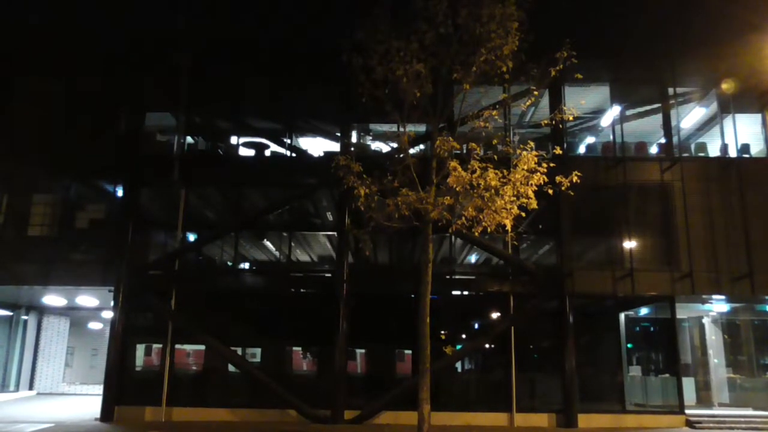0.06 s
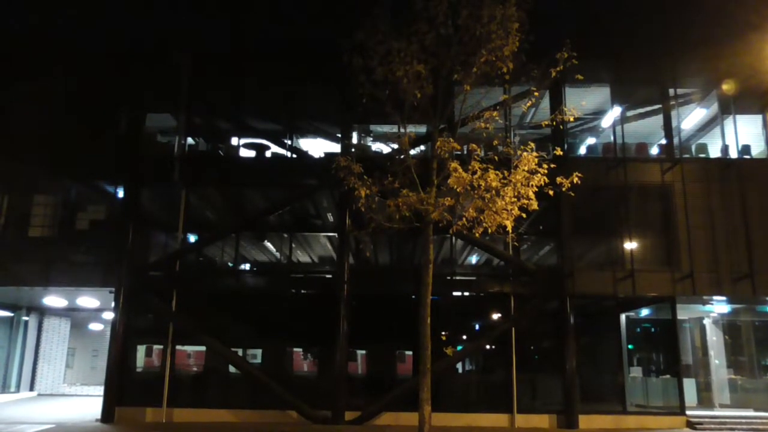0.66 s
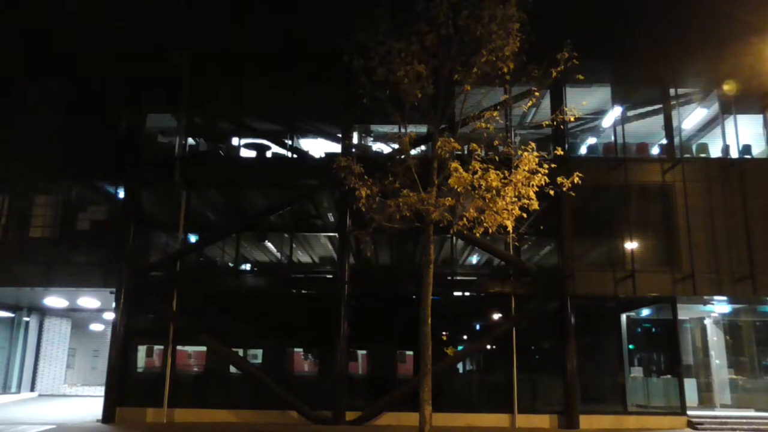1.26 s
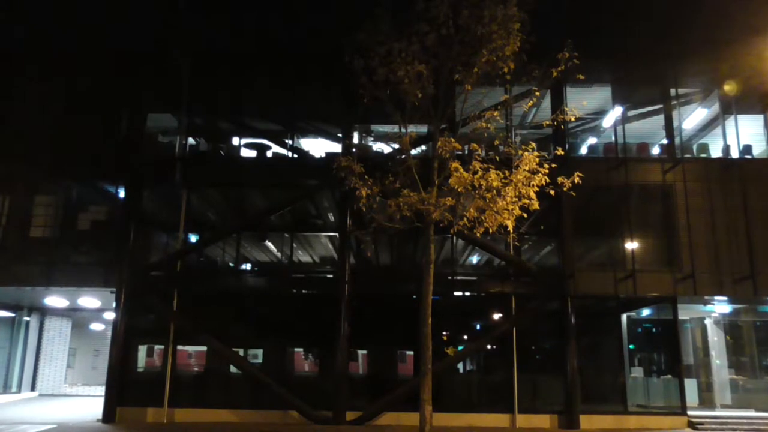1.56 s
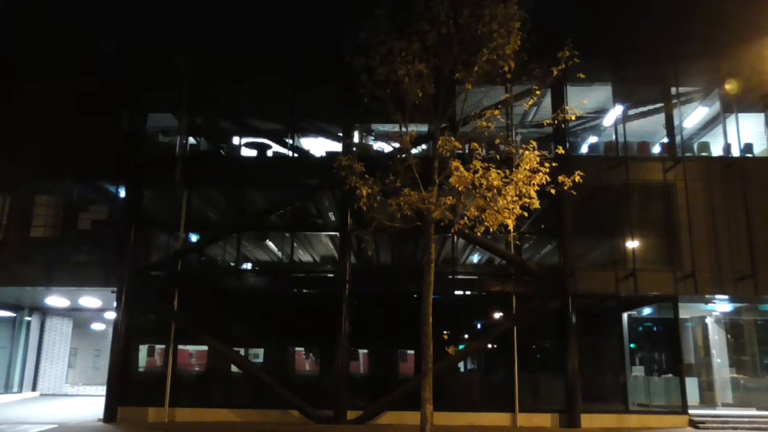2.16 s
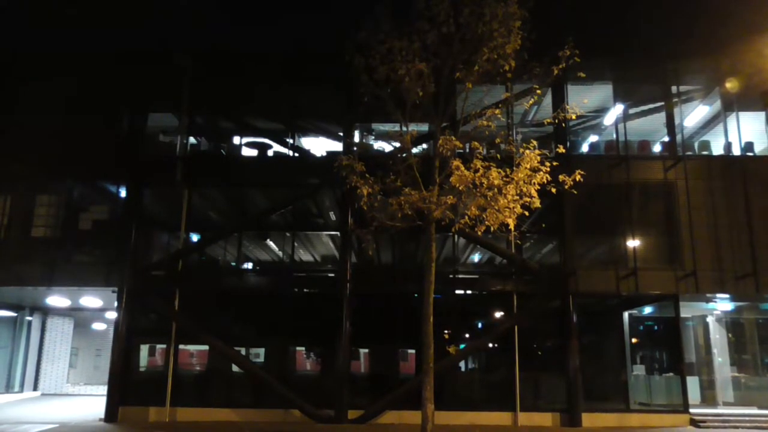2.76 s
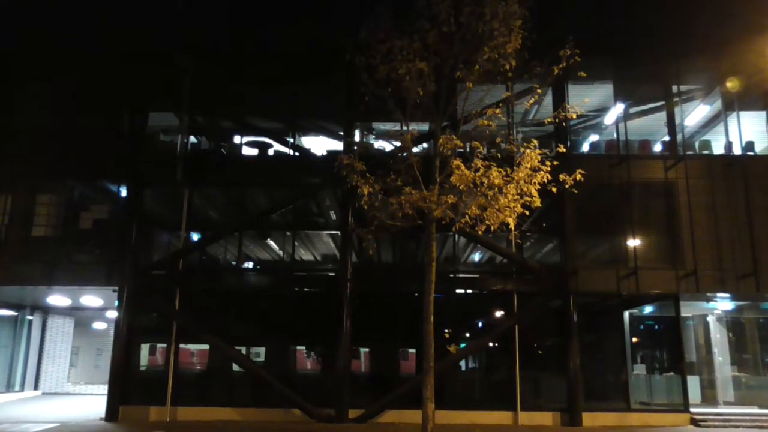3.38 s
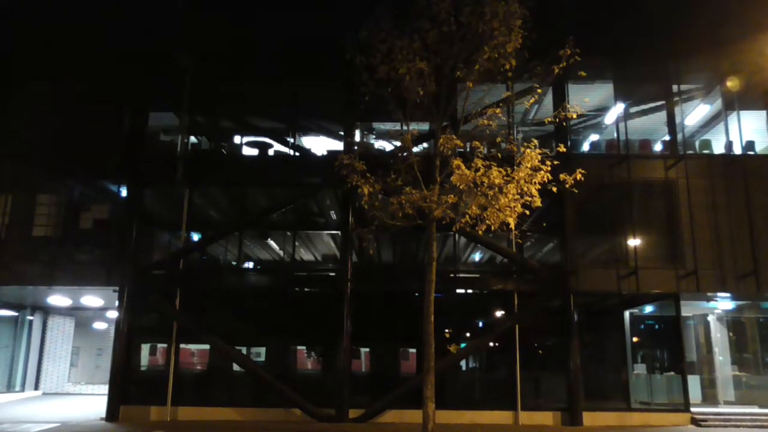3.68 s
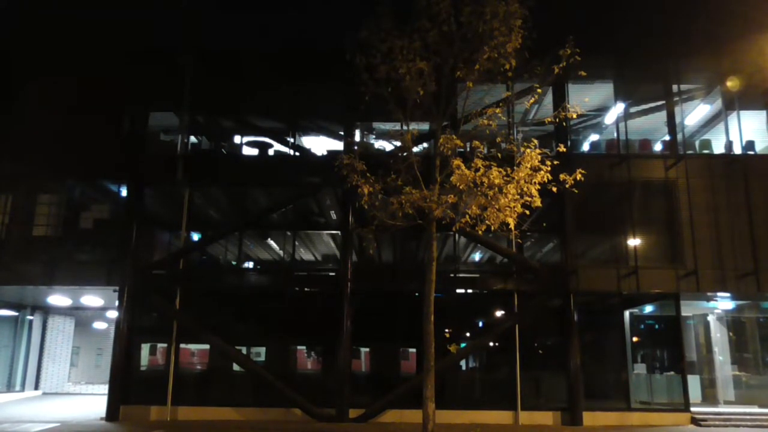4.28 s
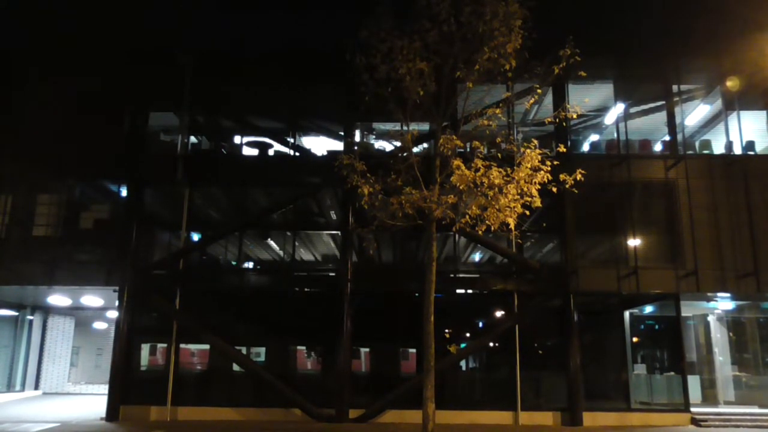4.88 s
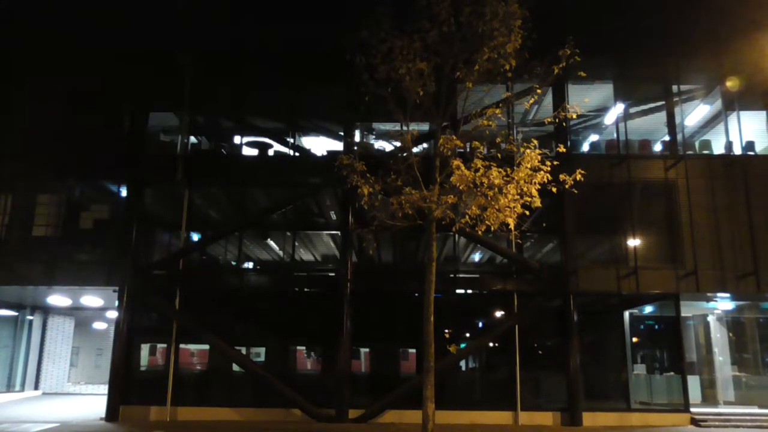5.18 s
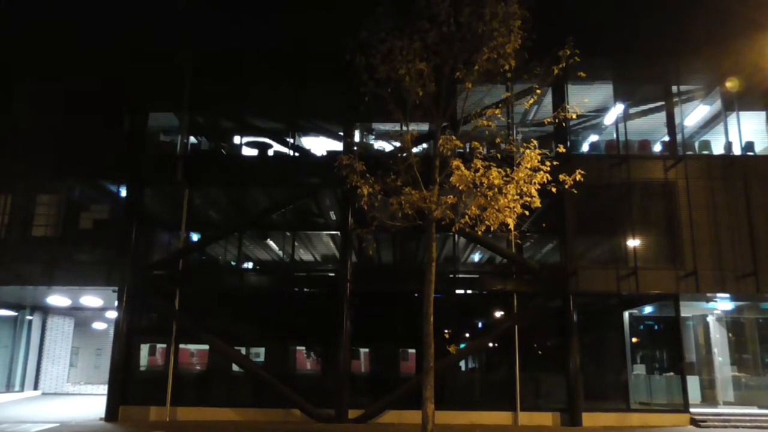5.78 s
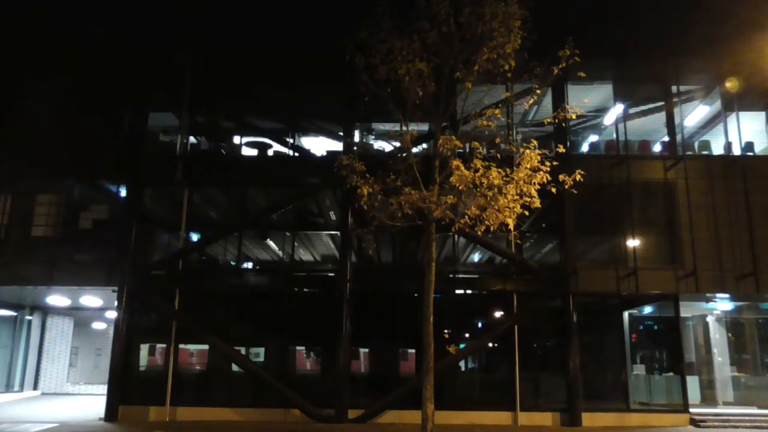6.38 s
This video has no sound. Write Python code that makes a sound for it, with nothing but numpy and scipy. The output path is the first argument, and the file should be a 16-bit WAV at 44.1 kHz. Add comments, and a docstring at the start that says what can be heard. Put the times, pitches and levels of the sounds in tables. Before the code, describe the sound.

Sharp, irregular ticks and faintly ringing knocks from a steel and glass building, over low city rumble and ventilation hum at night.

```python
"""A steel and glass building ticks on a quiet night street, most likely joints slipping as they cool.
Each joint gives way in a few quick steps. Heavy slips knock, with a dry crack and a bright snap, and set
the frame ringing; light ones are thin, bright ticks a little to the left. Both scatter off the building
front and echo down the street. Underneath, ventilation plant hums in the low rumble of the city,
with far traffic and a faint microphone hiss."""
import sys
import numpy as np
from scipy import signal
from scipy.fft import rfft, irfft
from scipy.io import wavfile

SR = 44100
rng = np.random.default_rng(int(sys.argv[2]) if len(sys.argv) > 2 else 0)


def output_pcm(signal):
    """Save a mono or channel-first signal as 16-bit PCM at the path in sys.argv[1].

    Samples are clipped to [-1, 1] before scaling.
    """
    pcm = np.clip(np.atleast_2d(signal).T, -1, 1) * 32767
    wavfile.write(sys.argv[1], SR, np.round(pcm).astype(np.int16))


N = 288414
T = np.arange(SR) / SR  # time within one slip, s
LEAD_S = .01  # pre-roll before a slip's last step

# noise beds of city rumble, far traffic and hiss: f/Hz, level/dB per Hz
RUMBLE_SPECTRUM = [(30, -112), (45, -91), (66, -84), (88, -77), (125, -77), (160, -73), (185, -67.5),
                   (228, -68.5), (272, -73), (325, -72), (400, -77), (470, -86.5), (560, -94.5),
                   (1000, -130)]
TRAFFIC_SPECTRUM = [(200, -110), (460, -87.5), (560, -77.5), (700, -81), (830, -85), (1000, -85.5),
                    (1400, -93.5), (1750, -105), (2100, -105), (2700, -115), (6000, -135)]
HISS_SPECTRUM = [(1000, -117), (3600, -112), (4800, -114), (6000, -118), (7500, -114), (9400, -110.5),
                 (11200, -112.5), (12000, -112), (12600, -109), (13400, -113), (13900, -110), (14500, -114),
                 (15500, -117)]
# stereo image of the street: f/Hz, side minus mid/dB, left minus right/dB
STREET_IMAGE = [(60, -44, 0), (130, -40, -1), (257, -12.5, 1), (547, -6.5, -1.5), (1100, -3.5, -3),
                (2200, -2, -2), (4500, 0, 0.5), (9000, -0.5, -.3), (13000, -0.5, -2)]
# ventilation tones: f/Hz, rms level/dB, sway/dB
VENT_TONES = [(100.1, -57, 1), (137.4, -59, 1), (179.7, -55.5, 4.5), (201.4, -51.5, 3), (236, -51, 2),
              (301.3, -64.5, 2.5), (373.8, -64, 4)]
# the quick steps in which a joint gives way: t before the last/s, relative level/dB
SLIP_STEPS = [(0.018, -11), (.0049, -7), (.0034, -1.5), (0, -0.5)]
# modes of the frame: f/Hz, relative level/dB, t60/s
FRAME_MODES = [(253.4, 4.5, 0.98), (320, -2, 0.91), (528.7, -7.5, 1), (575, -3.5, 0.55), (615, -6.5, .5),
               (745, -5, 0.41), (800, 0.5, 0.39), (922, -1, 0.4), (940, -5, 0.26), (1006, -1, 0.53),
               (1080, -9.5, 0.44), (1140, -8, 0.51), (1196, -8.5, 1), (1260, -7.5, 0.32),
               (1306, -4.5, 0.17), (1410, -15, 0.31), (1577, -12.5, 0.43), (1890, -19, 0.23),
               (2114, -16.5, 0.39), (2280, -17, 0.44), (3200, -19, 0.33), (8250, -26, 0.29)]
# EQ curves of the layers of a slip: f/Hz, gain/dB
THUD_EQ = [(200, -9), (450, -11), (750, 9.5), (860, -9), (1000, 4.5), (1300, -1.5), (1800, -12),
           (3000, -50)]
RASP_EQ = [(1200, 8.5), (2000, 0), (3500, 0), (4300, -3), (6500, -0.5), (8400, 2), (9300, -1), (10100, 1),
           (11000, -6), (11700, 0.5), (12500, -10), (15000, -25)]
CLICK_EQ = [(2500, -31), (6500, -18), (8300, -7), (9300, -7), (10000, 4), (11000, -9), (12500, -17),
            (15000, -40)]
CRACK_EQ = [(1000, -0.5), (1800, -0.5), (2250, 2.5), (2600, 0), (3300, 4), (4300, -1), (5800, -2.5),
            (8000, -8), (13000, -42)]
SNAP_EQ = [(3500, -40), (5500, -6), (7500, 1), (8400, 5), (9200, 0), (10200, 2.5), (11600, 2), (12400, -11),
           (15000, -28)]
# cues of the light slips: t/s, level/dB
LIGHT_SLIPS = [(0.0463, -54), (.838, -68), (0.881, -55), (1.744, -55), (2.029, -69), (2.1364, -57),
               (2.5669, -54.5), (3.661, -56), (4.3243, -56), (4.7618, -55.5), (4.94, -55.5), (5.7705, -55)]
# cues of the heavy slips: t/s, level/dB, snap over crack/dB, boosted ring f/Hz
HEAVY_SLIPS = [(.7263, -58, -4, 785), (1.4936, -51, 3.5, 650), (1.570, -68.5, 0, 880), (1.622, -68, 1, 895),
               (2.7854, -51.5, 1.5, 1280), (2.836, -62.5, 7, 1240), (3.454, -61, 2, 920),
               (4.2044, -53, -3.5, 910), (4.2445, -54.5, 5.5, 980), (5.2433, -50.5, -0.5, 974),
               (5.307, -73, 5, 970), (5.5943, -56, -6.5, 660), (6.2393, -54, 2, 1090)]


def undb(db):
    """Decibels to gain."""
    return 10 ** (np.asarray(db) / 20)


def curve(table, hz, column=1):
    """One column of a table, joined by straight lines over log frequency."""
    rows = np.array(table, float)
    return np.interp(np.log(hz + 1e-9), np.log(rows[:, 0]), rows[:, column])


def noise(spectrum):
    """A noise bed whose density follows the spectrum."""
    hz = np.fft.rfftfreq(N, 1 / SR)
    return irfft(rfft(rng.standard_normal(N)) * undb(curve(spectrum, hz)) * np.sqrt(SR / 2), N)


def stereo(mid, side, pan_db):
    """Mid and side to left and right; positive pan leans left."""
    return np.array([(mid + side) * undb(pan_db / 2), (mid - side) * undb(-pan_db / 2)])


def drift(rate_hz):
    """Slow random modulation with a standard deviation of 1."""
    hz = np.fft.rfftfreq(N, 1 / SR)
    slow = irfft(rfft(rng.standard_normal(N)) * np.exp(-(hz / rate_hz) ** 2), N)
    return (slow - slow.mean()) / slow.std()


def street(rumble_sway_db=0.93, traffic_sway_db=0.5):
    """Swaying rumble and far traffic with steady hiss; the bass is centred, the treble wide."""
    rumble_gain = undb(rumble_sway_db * drift(5.8))
    traffic_gain = undb(-traffic_sway_db * drift(1.7))
    mid, side = (rfft(rumble_gain * noise(RUMBLE_SPECTRUM)
                      + traffic_gain * noise(TRAFFIC_SPECTRUM)
                      + noise(HISS_SPECTRUM)) for _ in range(2))
    hz = np.fft.rfftfreq(N, 1 / SR)
    side = side * undb(curve(STREET_IMAGE, hz))
    return irfft(stereo(mid, side, pan_db=curve(STREET_IMAGE, hz, column=2)), N)


def ventilation(wander_rad=0.36, side_db=-15):
    """Mains and fan tones that waver in level and phase on their way across the street."""
    out = 0
    for hz, db, sway_db in VENT_TONES:
        phase = 2 * np.pi * hz * np.arange(N) / SR + wander_rad * drift(2.4)
        sway = undb(sway_db * drift(4.4))
        amplitude = sway * undb(db) * np.sqrt(2 / np.mean(sway ** 2))
        side = undb(side_db) * amplitude * np.cos(phase + drift(2.8))
        out = out + stereo(amplitude * np.sin(phase), side, pan_db=0)
    return out


def decay(t60, early_s=0):
    """Hard attack and exponential tail, starting early_s before the last step."""
    age = T - LEAD_S + early_s
    return (age >= 0) * np.exp(-np.log(1000) * np.maximum(age, 0) / t60)


def stepped(t60):
    """Envelope of a joint giving way in steps, each dying away; peak 1."""
    power = sum((undb(db) * decay(t60, early_s)) ** 2 for early_s, db in SLIP_STEPS)
    return np.sqrt(power / power.max())


def echoing(direct_db, direct_t60, near_t60, street_db, street_t60):
    """Envelope of the direct steps, a quick scatter off the building front and the street's longer tail."""
    direct = undb(direct_db) * stepped(direct_t60)
    tail = undb(street_db) * stepped(street_t60)
    return np.sqrt(direct ** 2 + stepped(near_t60) ** 2 + tail ** 2)


def panel(eq, ripple_db, width_hz):
    """Colour of a slipping part: its broad EQ curve with a thicket of small resonances."""
    hz = np.fft.rfftfreq(len(T), 1 / SR)
    window = np.exp(-(np.arange(-500, 501) / width_hz) ** 2)
    ripple = signal.fftconvolve(rng.standard_normal(len(hz)), window, "same")
    return undb(curve(eq, hz) + ripple_db * ripple / ripple.std())


def burst(envelope, colour, side_db, pan_db):
    """Dense scatter: enveloped noise, coloured, scaled to the envelope's energy and spread in stereo."""
    pair = irfft(rfft(envelope * rng.standard_normal((2, len(T)))) * colour, len(T))
    mid, side = pair * np.linalg.norm(envelope) / np.linalg.norm(pair, axis=1, keepdims=True)
    return stereo(mid, side * undb(side_db), pan_db)


def boost(sound, hz, width_hz, db):
    """Bell EQ: a slip drives one range of pitch harder than the rest."""
    band = signal.lfilter(*signal.iirpeak(hz, hz / width_hz, fs=SR), sound)
    return sound + (undb(db) - 1) * band


def place(out, at_s, sound):
    """Mix in a slip with its last step on the cue."""
    start = int((at_s - LEAD_S) * SR)
    part = sound[:, :N - start]
    out[:, start:start + part.shape[1]] += part


def frame_ring(ring_hz, vary_db=1.5, spread_rad=0.46, modes_db=-7.0, thud_db=-2.0, pan_db=-0.5):
    """The frame answers with a dull thud and its modes, balanced a little differently by each slip."""
    ring = 0
    for hz, db, t60 in FRAME_MODES:
        phase = rng.uniform(0, 2 * np.pi) + spread_rad * rng.standard_normal((2, 1))
        gain = undb(db + vary_db * rng.standard_normal())
        ring = ring + gain * stepped(t60) * np.sin(2 * np.pi * hz * T + phase)
    ring = ring * undb(modes_db + np.array([[pan_db], [-pan_db]]) / 2)
    thud_env = np.hypot(stepped(0.05), undb(-6) * stepped(0.63))
    thud_colour = panel(THUD_EQ, ripple_db=2.5, width_hz=27)
    thud = undb(thud_db) * burst(thud_env, thud_colour, side_db=-16, pan_db=-2.0)
    return boost(ring + thud, ring_hz, width_hz=122, db=7.0)


def ticks(click_over_rasp_db=12.5, bounce_s=0.015, bounce_db=-6):
    """Light slips of one joint: a short rasp ends in a sharp, high click and barely stirs the frame."""
    out = np.zeros((2, N))
    rasp_env = echoing(direct_db=-1, direct_t60=.008, near_t60=0.13, street_db=-7, street_t60=0.33)
    pavement_bounce = undb(bounce_db) * decay(.015, early_s=-bounce_s)
    rasp_env = np.hypot(rasp_env, pavement_bounce)
    click_env = undb(click_over_rasp_db) * decay(0.0032, early_s=.0004)
    rasp_colour = panel(RASP_EQ, ripple_db=2.5, width_hz=42)
    click_colour = panel(CLICK_EQ, ripple_db=3.0, width_hz=74)
    for at_s, db in LIGHT_SLIPS:
        rasp = burst(rasp_env, rasp_colour, side_db=-9, pan_db=1.0)
        click = burst(click_env, click_colour, side_db=-3, pan_db=3)
        place(out, at_s, undb(db) * (rasp + click + frame_ring(ring_hz=950)))
    return out


def knocks(full_slip_db=-52, full_ring_db=-45, ring_db_per_db=.55):
    """Heavy slips: a dry crack and a bright snap over the frame, which rings more the harder the slip."""
    out = np.zeros((2, N))
    crack_env = echoing(direct_db=-9, direct_t60=0.0059, near_t60=0.19, street_db=-12, street_t60=0.68)
    snap_env = echoing(direct_db=5, direct_t60=0.0075, near_t60=0.069, street_db=-10.5, street_t60=0.46)
    for at_s, db, snap_db, ring_hz in HEAVY_SLIPS:
        crack = burst(crack_env, panel(CRACK_EQ, ripple_db=2.5, width_hz=39), side_db=-9.5, pan_db=-1)
        snap = burst(snap_env, panel(SNAP_EQ, ripple_db=1.5, width_hz=46), side_db=-4, pan_db=0.5)
        attack = boost(crack + undb(snap_db) * snap, hz=3450, width_hz=570, db=1.5)
        ring_gain = undb(full_ring_db + ring_db_per_db * (db - full_slip_db))
        place(out, at_s, undb(db) * attack + ring_gain * frame_ring(ring_hz))
    return out


def scene():
    """The ticking building over the night street."""
    return knocks() + ticks() + street() + ventilation()


def record(dry):
    """A steep low-pass at 15.6 kHz trims the air off the mix."""
    return signal.sosfilt(signal.ellip(10, .2, 70, 15600, fs=SR, output="sos"), dry)


dry = scene()
out = record(dry)
output_pcm(out)
```